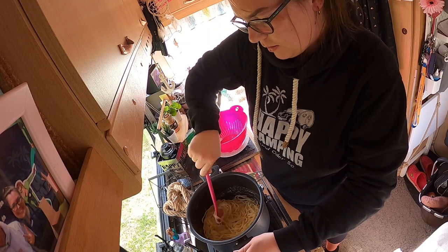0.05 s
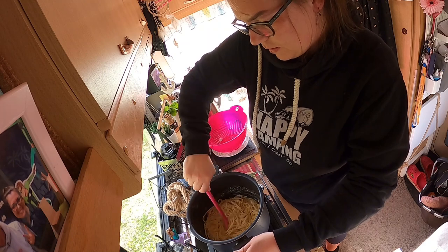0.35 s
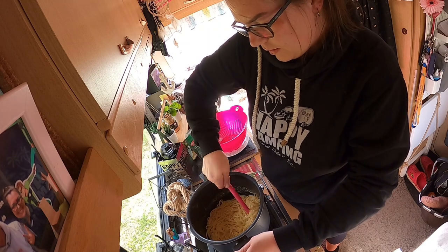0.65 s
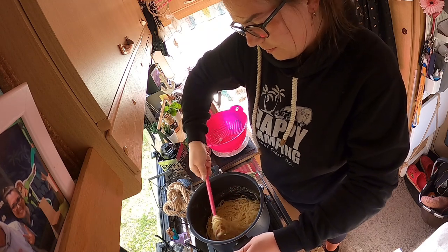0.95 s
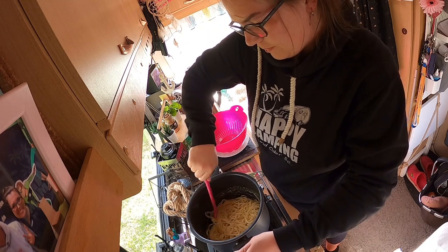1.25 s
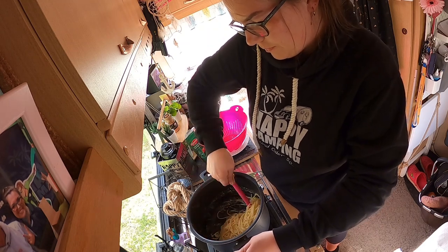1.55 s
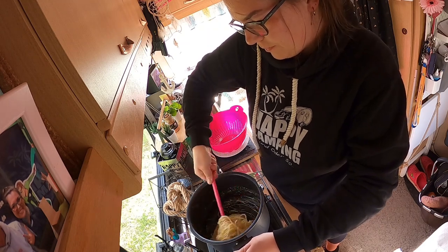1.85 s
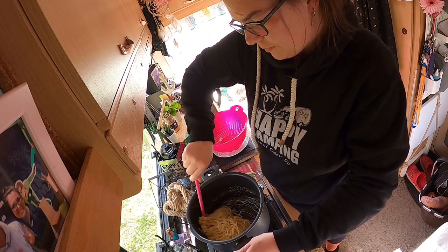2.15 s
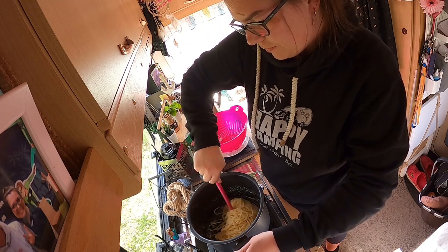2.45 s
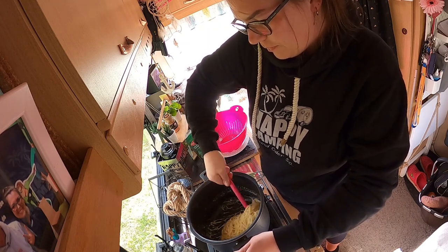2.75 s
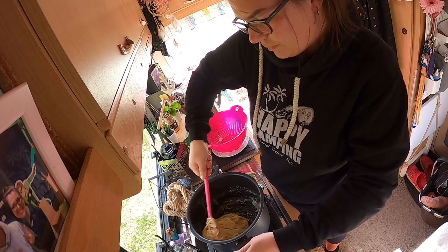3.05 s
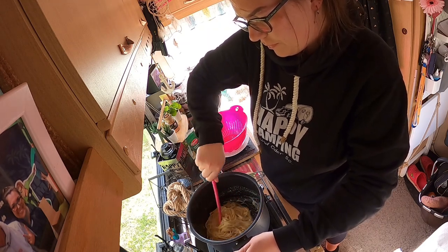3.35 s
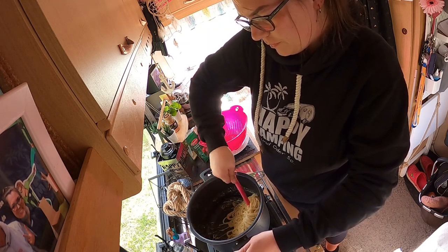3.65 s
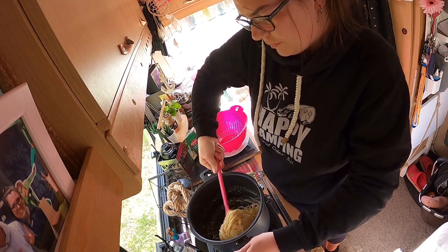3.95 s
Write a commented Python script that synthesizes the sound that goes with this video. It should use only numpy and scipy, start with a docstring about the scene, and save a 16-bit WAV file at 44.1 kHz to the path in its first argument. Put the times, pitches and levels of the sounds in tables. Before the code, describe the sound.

Spaghetti is stirred in a hot pot throughout, with wet crackling swells about once a second over a soft sizzle. The plastic spoon knocks dully on the pot at the start, near 1.3 and 1.7 seconds, and again at 2.7, sometimes with a tiny squeak or scrape. More short scrapes come around 3.7 seconds. A low, uneven rumble lies underneath in the small room.

```python
"""Stirring spaghetti in a hot pot

A plastic spoon stirs about one turn a second in a small wooden cabin. Wet strands crackle as they
unstick and moisture sizzles on the base, both coloured by the air in the pot. The spoon squeaks,
scrapes and chatters by friction, the pot thuds on the stove, and a low rumble lies under it all."""
import sys
import numpy as np
from scipy import signal
from scipy.fft import rfft, irfft, next_fast_len
from scipy.io import wavfile
from scipy.ndimage import map_coordinates

SR = 44100
rng = np.random.default_rng(int(sys.argv[2]) if len(sys.argv) > 2 else 0)


def master(y):
    """Save y as 16-bit WAV."""
    cut = np.clip(np.atleast_2d(y).T, -1, 1)
    pcm = np.round(cut * 32767)  # scale
    wavfile.write(sys.argv[1], SR, pcm.astype(np.int16))


N = 176400
TIME = np.arange(N) / SR


def amp(db):
    """Amplitude grows tenfold every 20 dB."""
    return 10 ** (np.asarray(db) / 20)


def unit(x):
    """Normalisation to an rms of 1."""
    return x / np.sqrt(np.mean(x ** 2) + 1e-20)


def response(points):
    """Gain as a function of frequency: (Hz, dB) points joined on a log axis."""
    hz, db = np.transpose(points)
    return lambda f: amp(np.interp(np.log(f + 1), np.log(hz + 1), db))


def envelope(points):
    """Amplitude envelope: (s, dB) points joined by exponential ramps."""
    return amp(np.interp(TIME, *np.transpose(points)))


def wobble(knots_per_s):
    """Slow random modulation: a spline through Gaussian knots."""
    return map_coordinates(rng.standard_normal(1000), [TIME * knots_per_s], mode="wrap")


def filtered(x, gain):
    """Linear filtering multiplies the spectrum by a gain."""
    size = next_fast_len(N + SR // 2)
    return irfft(rfft(x, size) * gain(np.fft.rfftfreq(size, 1 / SR)), size)[..., :N]


def convolved(x, impulse):
    """Convolution with an impulse response scaled to unit energy."""
    energy = np.mean(np.sum(impulse ** 2, axis=-1))
    return signal.fftconvolve(x, np.atleast_2d(impulse / np.sqrt(energy)), axes=1)[:, :N]


def minimum_phase(gain, size=4096):
    """Folding the cepstrum gives a causal impulse response with the given gain."""
    cepstrum = irfft(np.log(np.maximum(gain(np.fft.rfftfreq(size, 1 / SR)), 1e-6)))
    cepstrum[1:size // 2] *= 2
    cepstrum[size // 2 + 1:] = 0
    return irfft(np.exp(rfft(cepstrum)))


def noise():
    """Two uncorrelated white noises: mid and side."""
    return rng.standard_normal((2, N))


def pops(per_s, spread_db):
    """Shot noise: random impulses of uneven size, rms 1."""
    size = amp(spread_db * np.minimum(rng.exponential(size=N), 5))
    return unit((rng.random(N) < per_s / SR) * size * rng.choice([-1, 1], (2, N)))


def pressure(contacts, t60_s):
    """Contact pressure of the spoon: sudden onset, hold, exponential release."""
    return sum((TIME >= start) * amp(db - 60 * np.maximum(TIME - start - hold, 0) / t60_s)
               for start, db, hold in contacts)


def clumped(x, depth_db, clump_hz=900, clumps_per_s=24):
    """Amplitude modulation band by band, as pockets between the strands open and close."""
    hz, t, spectra = signal.stft(x, SR, nperseg=256)
    grid = np.meshgrid(hz / clump_hz, t * clumps_per_s, indexing="ij")
    swell = map_coordinates(rng.standard_normal((len(hz), len(t))), grid)
    return signal.istft(spectra * amp(depth_db * swell), nperseg=256)[1][:, :N]


def in_pot(x, colour, cavity_db=-8, echo_db=-11, echo_t60_s=.03):
    """Cavity resonance adds peaks to a source's colour; reflection between the walls adds echoes."""
    # air resonances of the pot (frequency [Hz], bandwidth [Hz], level [dB])
    air_modes = [(1720, 450, -1), (2740, 350, -2), (3850, 480, -4), (6540, 200, -1), (7090, 150, -1),
                 (7680, 300, 2)]
    peaks = lambda f: sum(amp(db) / (1 + (2 * (f - hz) / width) ** 2) for hz, width, db in air_modes)
    t = np.arange(SR // 20) / SR
    echoes = rng.standard_normal((2, len(t))) * amp(-60 * t / echo_t60_s)
    echoes *= amp(echo_db) / np.linalg.norm(echoes[0])
    direct = minimum_phase(lambda f: response(colour)(f) * (1 + amp(cavity_db) * peaks(f)))
    return convolved(x, signal.fftconvolve(direct[None], echoes + (t == 0), axes=1))


def pasta(slide_db=-2.5, crackle_db=-1):
    """Wet strands make friction noise as they slide and tiny impulses as they unstick."""
    # strength of the sliding (time [s], level [dB])
    stirring = [(0, -51), (.18, -54.5), (.28, -65), (.54, -53.5), (.66, -52.5), (.76, -59.5), (1.04, -61.5),
                (1.11, -53.5), (1.26, -58.5), (1.45, -59), (1.465, -53.5), (1.62, -52), (1.8, -63),
                (2.35, -63.5), (2.44, -56), (2.67, -55), (2.8, -58.5), (3.42, -60.5), (3.55, -53.5),
                (3.735, -52.5), (3.765, -61.5), (4, -57.5)]
    # spectrum of the wet strands (frequency [Hz], gain [dB])
    colour = [(300, -16), (780, -13.5), (1150, -1), (2250, -3), (3700, 1), (4400, -5), (7500, -10),
              (9000, -24), (15000, -35.5)]
    wet = amp(slide_db) * noise() + amp(crackle_db) * pops(per_s=1300, spread_db=3)
    return in_pot(clumped(wet, depth_db=2.4) * envelope(stirring), colour)


def sizzle(hiss_db=-3, fizz_db=-7, spit_db=-5.5, spit_hz=7900):
    """Moisture fizzes on the hot base as shot noise, louder and brighter where the spoon bares it."""
    # strength of the sizzle (time [s], level [dB])
    boiling = [(0, -56), (.25, -59.5), (.62, -59), (1.04, -61), (1.13, -59), (1.44, -58.5), (1.465, -54.5),
               (1.72, -57), (2.15, -53), (2.6, -53.5), (2.78, -56), (3.25, -56), (3.58, -52.5),
               (3.8, -57.5)]
    # spectrum of the sizzle (frequency [Hz], gain [dB])
    colour = [(600, -24), (2300, -4.5), (3700, -0.5), (4900, 2), (7750, -2), (9000, -10), (13500, -19),
              (15600, -45)]
    heat = envelope(boiling) * amp(wobble(18))
    bubbles = lambda: pops(per_s=5700, spread_db=2)
    fizz = clumped(amp(hiss_db) * noise() + amp(fizz_db) * bubbles(), depth_db=1.2)
    treble = unit(filtered(bubbles(), lambda f: f ** 4 / (f ** 4 + spit_hz ** 4)))
    spit = amp(spit_db) * unit(heat ** .38) * treble
    return in_pot(heat * (fizz + spit), colour)


def rumble_and_drone(rumble_trim_db=-1, drone_db=-49):
    """Modulated low-frequency noise is heard as an uneven rumble and a steadier hollow drone."""
    # swells of the rumble (time [s], level [dB])
    swells = [(0, -40.5), (.8, -42), (1.0, -44.5), (1.1, -37), (1.24, -46), (1.32, -36.5), (1.55, -41),
              (1.75, -35), (2.0, -43.5), (2.22, -37), (2.5, -43), (2.89, -40), (2.97, -49), (3.05, -38),
              (3.45, -47), (3.66, -38.5), (4, -42.5)]
    # spectrum of the rumble (frequency [Hz], gain [dB])
    rumble_colour = [(12, -9), (26, 2), (62, -4), (80, -10), (102, -8), (125, -13.5), (300, -77)]
    # spectrum of the drone (frequency [Hz], gain [dB])
    drone_colour = [(80, -33), (155, 3), (205, -1.5), (275, -11.5), (350, -17), (500, -19), (680, -29),
                    (1500, -29.5), (6000, -86)]
    swell = envelope(swells)
    rumble = unit(filtered(noise(), response(rumble_colour)))
    drone = unit(filtered(noise(), response(drone_colour)))
    drone *= amp(drone_db + 1.47 * wobble(8)) * unit(swell ** .25)
    return amp(rumble_trim_db) * swell * rumble + drone


def squeaks():
    """Friction briefly sustains one mode of the pot; which one depends on where the spoon touches."""
    # squeaks on the wall (time [s], level [dB], hold [s], frequency [Hz])
    touches = [(0.001, -49, 0.057, 531), (0.037, -40.5, 0.002, 2580), (1.281, -41, 0.013, 1547),
               (1.647, -41.5, 0.02, 1465)]
    tone = sum(np.sin(2 * np.pi * hz * TIME + .5 * wobble(46)) * pressure([contact], t60_s=.045)
               for *contact, hz in touches)
    return np.array([tone, np.zeros(N)])


def scrapes():
    """Sliding friction: the spoon's edge catches with a tick, then drags in a short gritty stroke."""
    # strokes on the metal (time [s], level [dB], hold [s])
    strokes = [(0.0446, -44.5, 0.002), (0.635, -52, 0.029), (1.636, -44, 0.0059), (1.679, -50.5, 0.012),
               (2.69, -42.5, 0.0094), (3.69, -45, 0.019), (3.732, -47, 0.0083)]
    # spectrum of the scraping (frequency [Hz], gain [dB])
    colour = [(500, -24), (1200, 4), (2900, 3.5), (7500, -10), (15000, -47)]
    grit = unit(pops(per_s=1000, spread_db=3) + .5 * noise())
    for start, _, _ in strokes:
        grit[:, int(start * SR) + 1] += 10  # the tick
    return in_pot(grit * pressure(strokes, t60_s=.05), colour)


def thuds(attack_s=.0018, t60_s=.15, overtone_ratio=1.9, overtone_db=-15):
    """Damped oscillations give the low thuds of the pot and the low ring of the spoon's knocks."""
    # thuds of the pot and low ring of the knocks (time [s], level [dB], frequency [Hz])
    low_tones = [(0.045, -26.5, 100), (0.052, -41.5, 335), (1.294, -24.5, 43.7), (1.306, -35, 301),
                 (1.313, -31, 164.3), (1.348, -25.5, 46.2), (1.683, -20.5, 75.3), (1.707, -26.5, 146.4),
                 (2.729, -25, 111)]
    mid = np.zeros(N)
    for start, db, hz in low_tones:
        t = np.maximum(TIME - start, 0)
        phase = 2 * np.pi * hz * t
        tone = np.sin(phase) + amp(overtone_db) * np.sin(overtone_ratio * phase)
        mid += amp(db - 60 * t / t60_s) * (1 - np.exp(-t / attack_s)) * tone
    return np.array([mid, np.zeros(N)])


def chatter(slips_per_s=380, release_t60_s=.045, friction_db=-3, ring_db=-5.5, body_db=-2):
    """Stick-slip of the spoon on the wall rings the pot, whose higher modes die sooner."""
    # knocks on the wall (time [s], level [dB], hold [s])
    knocks = [(.051, -42.5, 0.007), (1.2745, -34, 0.0084), (1.639, -37, 0.015), (1.682, -38, 0.0084),
              (1.708, -50, 0.016), (2.723, -41, 0.02)]
    # modes of the pot, damped by hand and food (frequency [Hz], level [dB])
    modes = [(302, -6), (524, -8), (590, -12), (710, -12), (825, -6), (1065, -5), (1180, -10), (1327, -8),
             (1476, -4)]
    # spectrum of the knock's dull body (frequency [Hz], gain [dB])
    colour = [(100, -17), (300, -1), (650, -8), (1100, 1.5), (1550, -5), (1950, -14), (3800, -54)]
    lowest_t60_s, attack_s = .115, .0005
    slips = np.zeros((2, N))
    for start, db, hold in knocks:
        gaps = np.exp(.35 * rng.standard_normal(size=14)) / slips_per_s
        delays = np.cumsum(gaps) - gaps[0]
        size = amp(db - 60 * np.maximum(delays - hold, 0) / release_t60_s) * np.sqrt(SR / slips_per_s)
        slips[:, ((start + delays) * SR).astype(int)] += size
    slips[1] *= rng.choice([-1, 1], N)  # decorrelates side from mid
    force = slips + amp(friction_db) * noise() * pressure(knocks, release_t60_s)
    t = np.arange(SR // 3) / SR
    ring = np.zeros(len(t))
    for k, (hz, db) in enumerate(modes):
        t60_s = lowest_t60_s * np.sqrt(modes[0][0] / hz)
        ring += (-1) ** k * amp(db - 60 * t / t60_s) * np.sin(2 * np.pi * hz * t)
    ring *= 1 - np.exp(-(t / attack_s) ** 2)
    body = minimum_phase(response(colour))
    return amp(ring_db) * convolved(force, ring) + amp(body_db) * convolved(force, body)


def cabin(x, reverb_db=-8, t60_s=.14, delay_s=.004):
    """Reverberation: diffuse reflections from the wooden walls decay exponentially."""
    t = np.arange(SR // 3) / SR
    tail = rng.standard_normal((2, len(t))) * amp(-60 * t / t60_s) * (t > delay_s)
    return amp(reverb_db) * convolved(x[:1], tail)


def hollow_note(width_hz=170, upper_ratio=1.55, upper_db=-6.5):
    """Rubbing along the bottom excites two resonances that glide together as the pasta moves."""
    # course of the lower resonance (time [s], frequency [Hz], level [dB])
    glide = [(.3, 992, -76), (0.659, 1079, -60.5), (.95, 1001, -75.5), (1.439, 1050, -76),
             (1.48, 1023, -59.5), (2.15, 1046, -67.5), (2.65, 1123, -63), (2.95, 930, -60.5),
             (3.249, 959.5, -66), (3.62, 1062, -60), (3.85, 1080, -73)]
    t, hz, db = np.transpose(glide)
    phase = 2 * np.pi * np.cumsum(np.interp(TIME, t, hz)) / SR
    drift = lambda: filtered(noise(), lambda f: 1 / (1 + (2 * f / width_hz) ** 2))
    band = lambda angle: unit(drift() * np.cos(angle) + drift() * np.sin(angle))
    return envelope(np.c_[t, db]) * (band(phase) + amp(upper_db) * band(upper_ratio * phase))


def scene(right_lead_s=.000022):
    """Sources superpose as mid and side, reaching left and right with unequal level and delay."""
    # stereo width (frequency [Hz], side gain [dB])
    width = [(50, -29), (200, -11), (600, -9.5), (4000, -6), (12000, 1)]
    # stereo balance (frequency [Hz], left over right [dB])
    balance = [(125, 1.56), (250, -0.5), (2000, 1.5), (12000, 0.5)]
    spoon = chatter() + scrapes() + squeaks()
    mid, side = spoon + cabin(spoon) + thuds() + pasta() + hollow_note() + sizzle() + rumble_and_drone()
    side = filtered(side, response(width))
    share = np.array([[.5], [-.5]])  # left, right
    pan = lambda f: response(balance)(f) ** share * np.exp(-2j * np.pi * f * share * right_lead_s)
    return filtered(np.array([mid + side, mid - side]), pan)


def record(dry, cutoff_hz=15600):
    """An ideal low-pass filter limits the bandwidth."""
    return filtered(dry, lambda f: f < cutoff_hz)


dry = scene()
out = record(dry)
master(out)
```